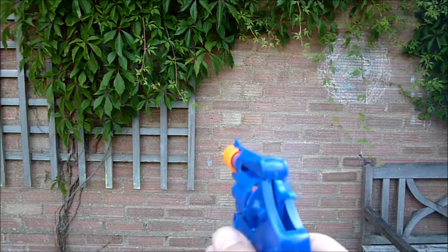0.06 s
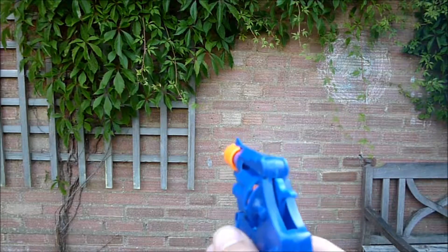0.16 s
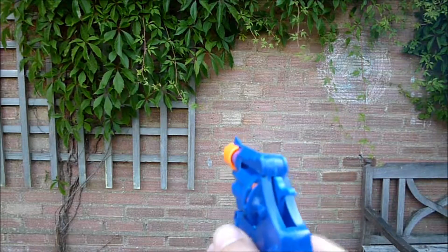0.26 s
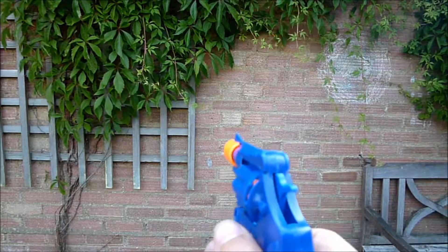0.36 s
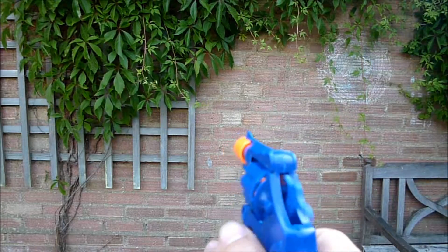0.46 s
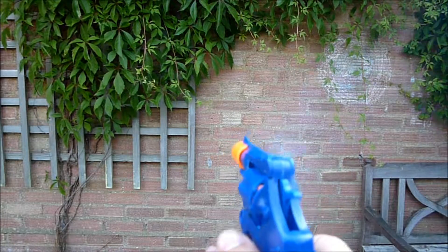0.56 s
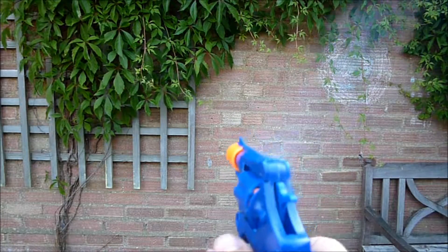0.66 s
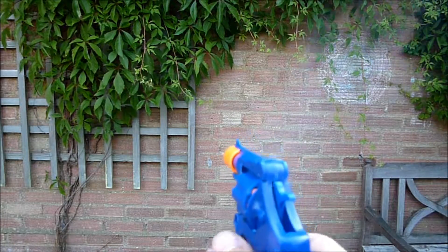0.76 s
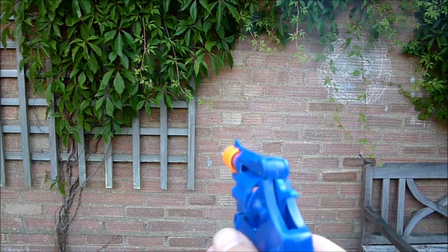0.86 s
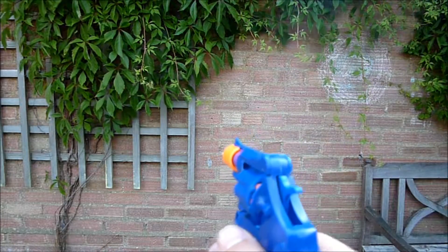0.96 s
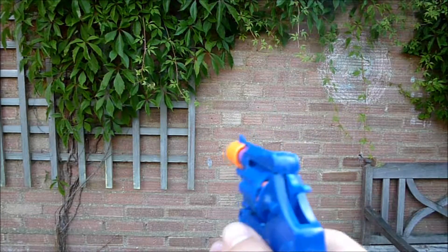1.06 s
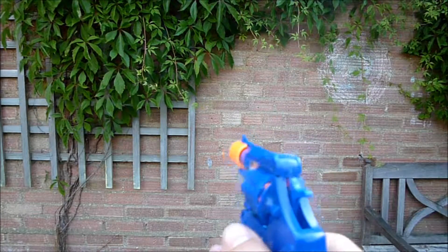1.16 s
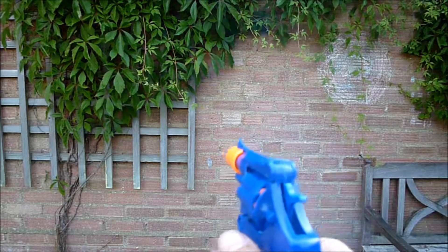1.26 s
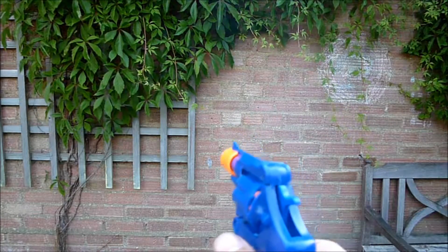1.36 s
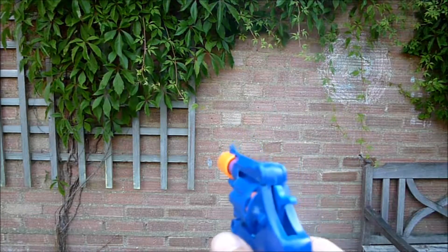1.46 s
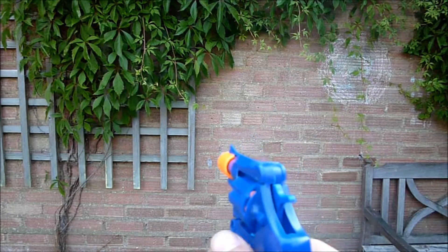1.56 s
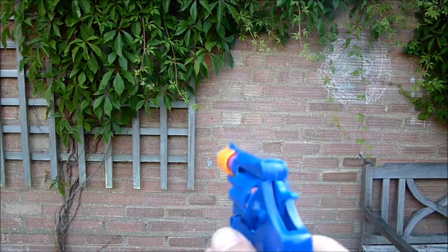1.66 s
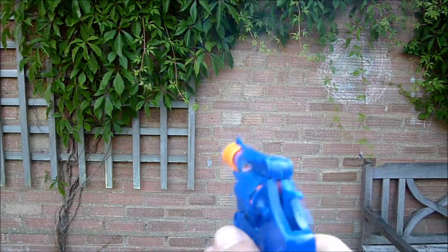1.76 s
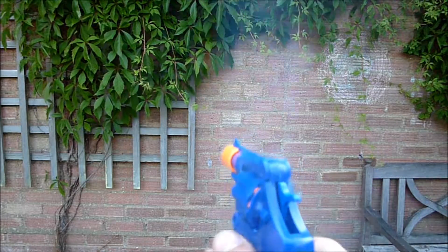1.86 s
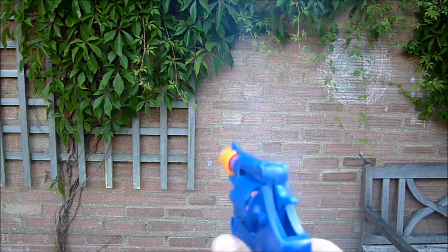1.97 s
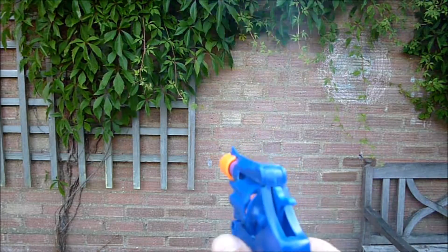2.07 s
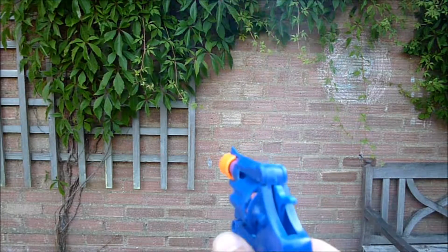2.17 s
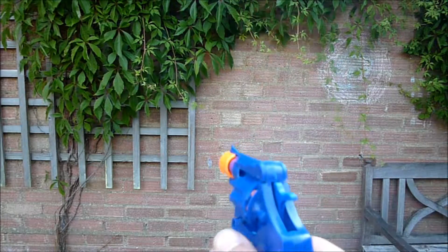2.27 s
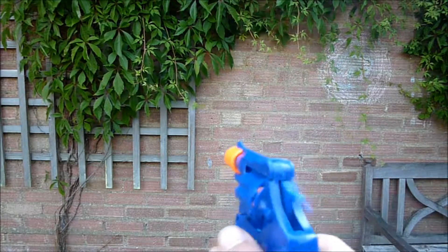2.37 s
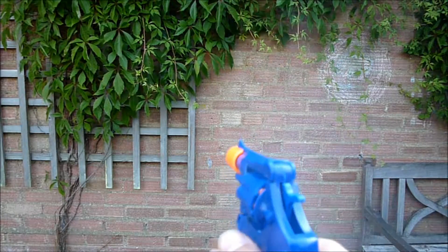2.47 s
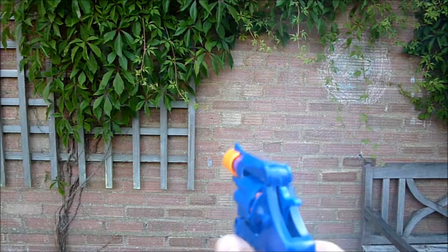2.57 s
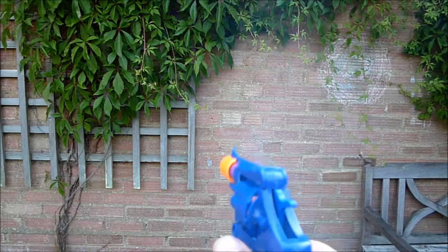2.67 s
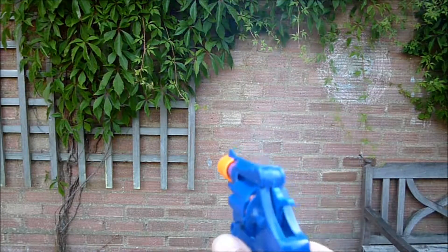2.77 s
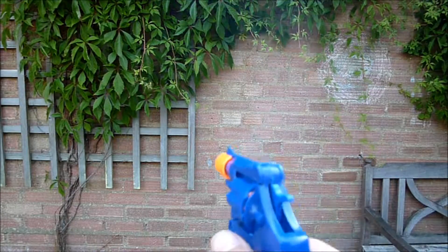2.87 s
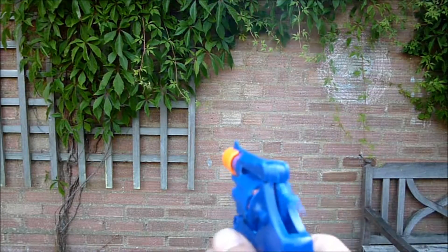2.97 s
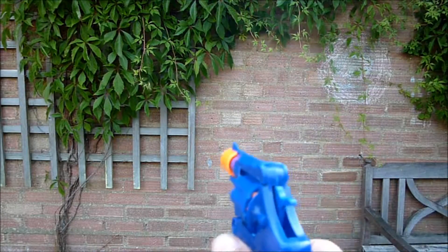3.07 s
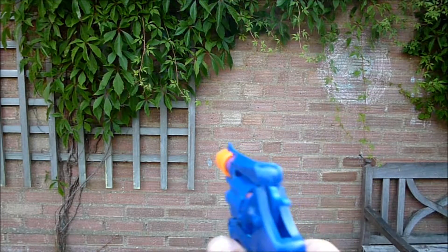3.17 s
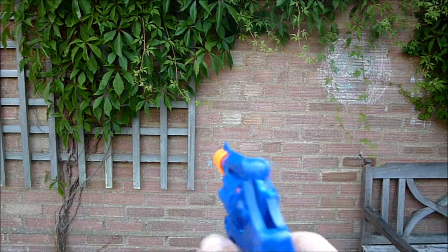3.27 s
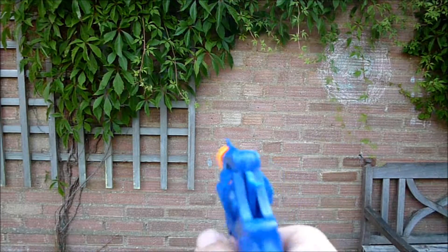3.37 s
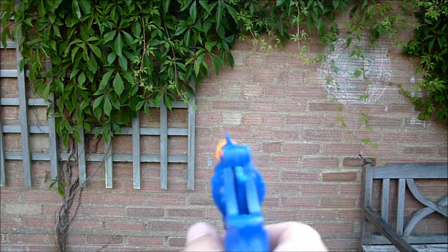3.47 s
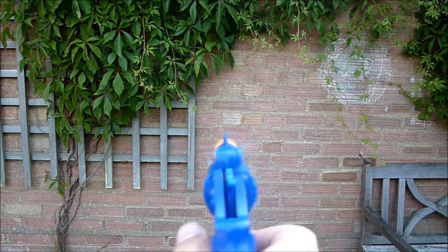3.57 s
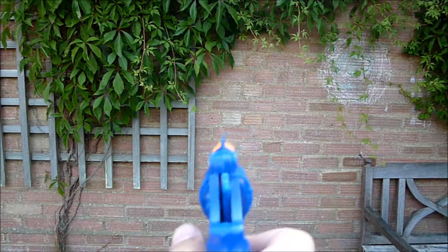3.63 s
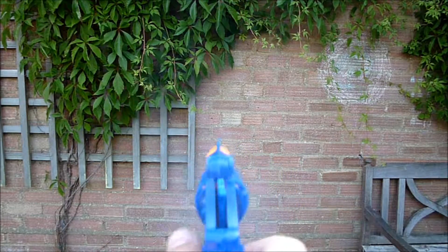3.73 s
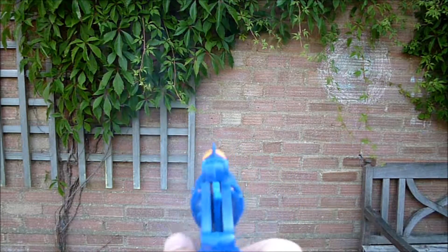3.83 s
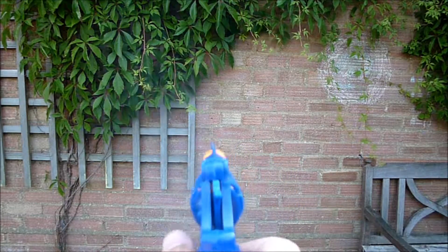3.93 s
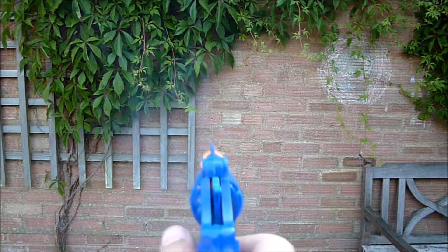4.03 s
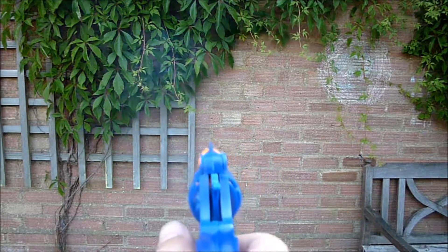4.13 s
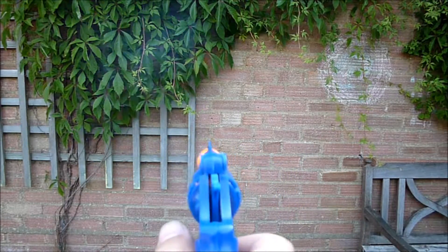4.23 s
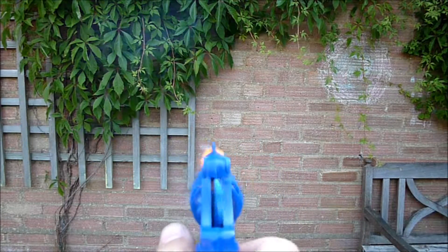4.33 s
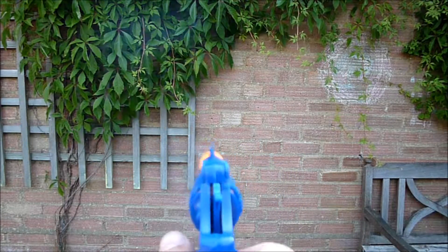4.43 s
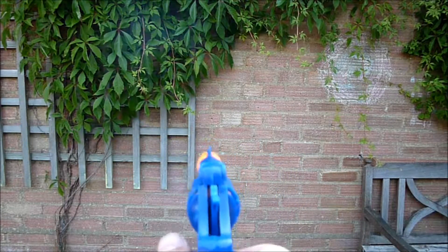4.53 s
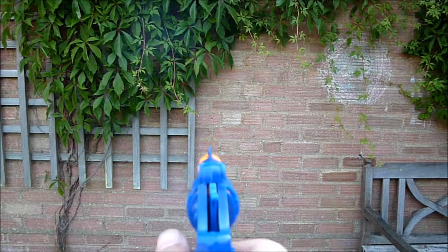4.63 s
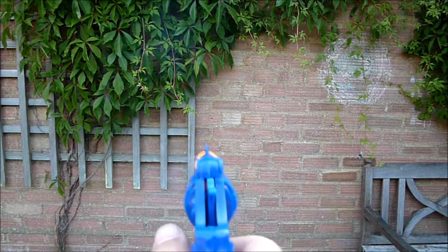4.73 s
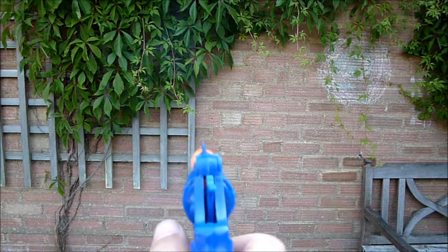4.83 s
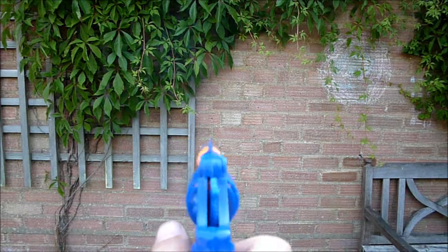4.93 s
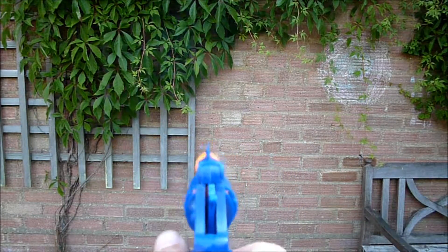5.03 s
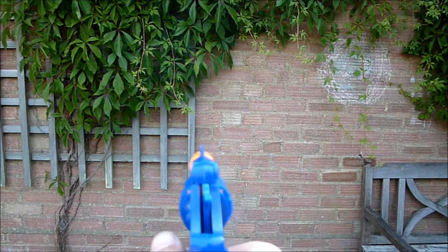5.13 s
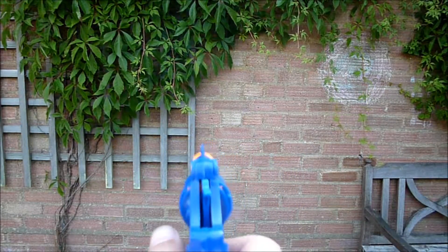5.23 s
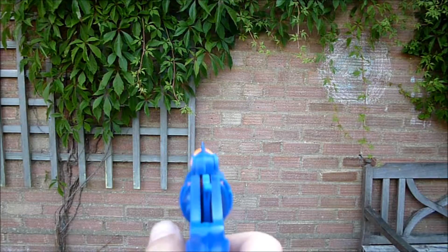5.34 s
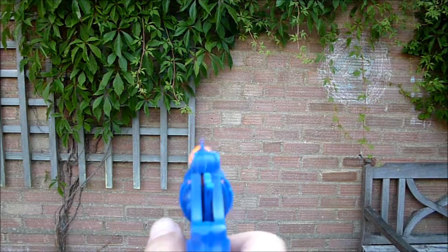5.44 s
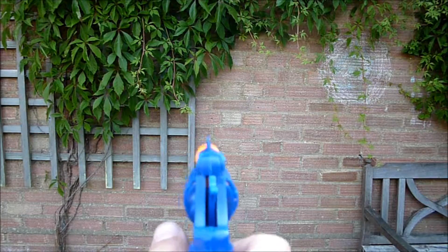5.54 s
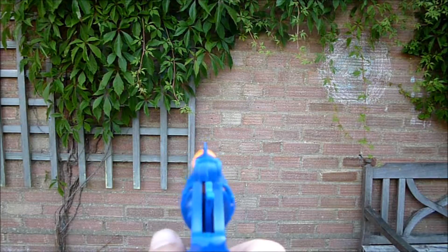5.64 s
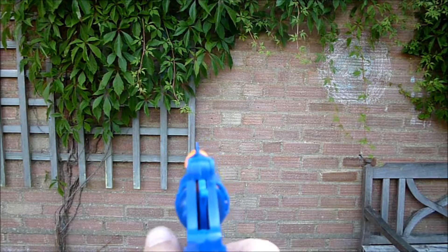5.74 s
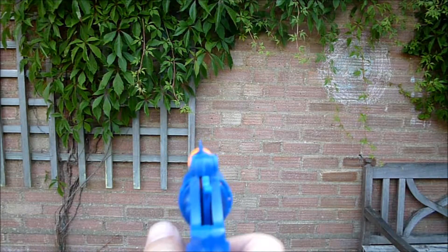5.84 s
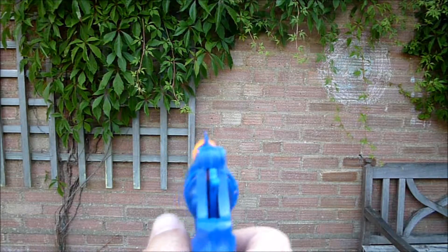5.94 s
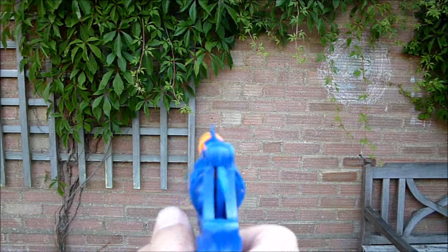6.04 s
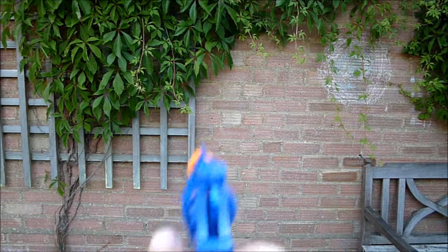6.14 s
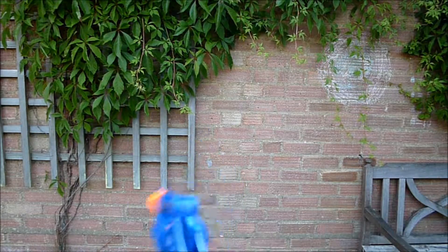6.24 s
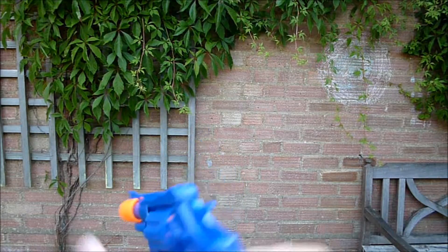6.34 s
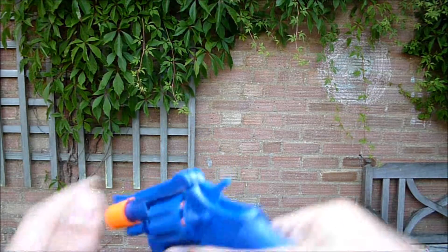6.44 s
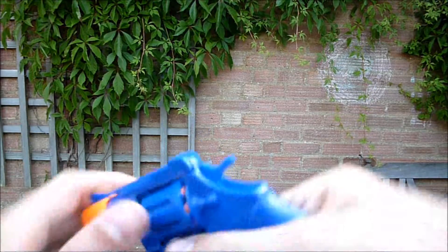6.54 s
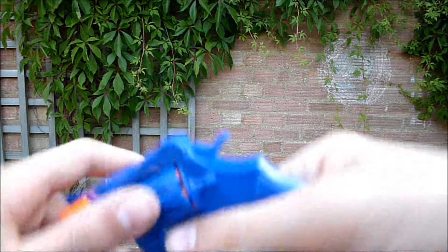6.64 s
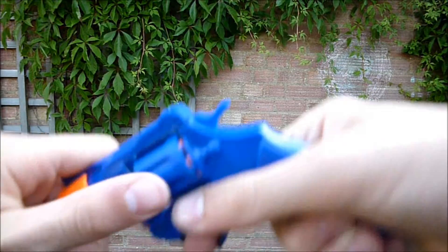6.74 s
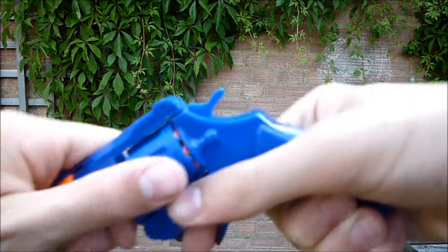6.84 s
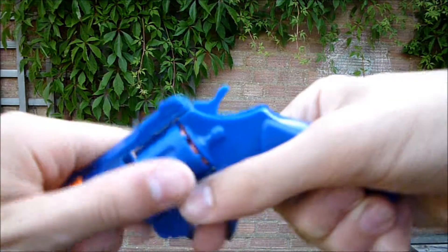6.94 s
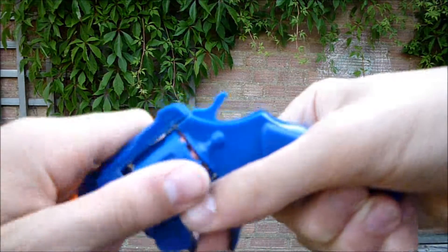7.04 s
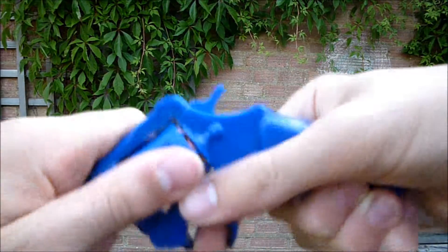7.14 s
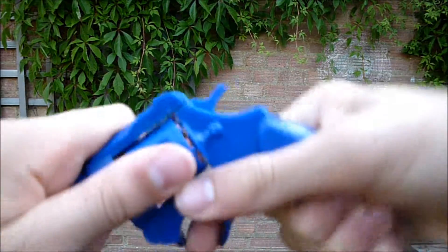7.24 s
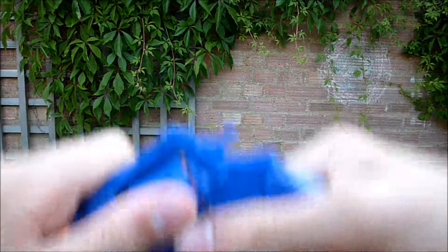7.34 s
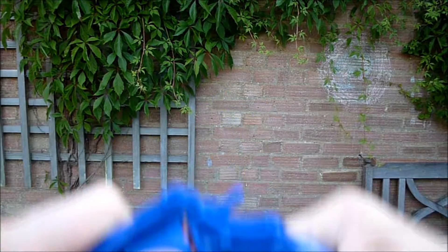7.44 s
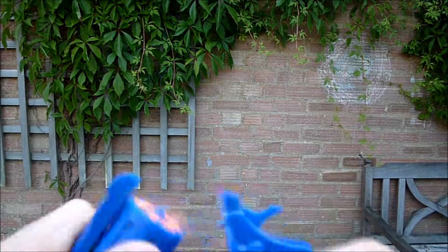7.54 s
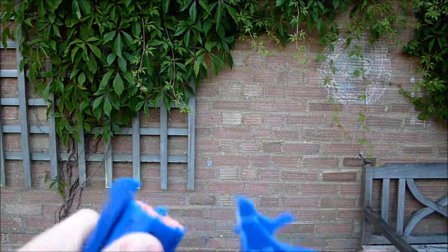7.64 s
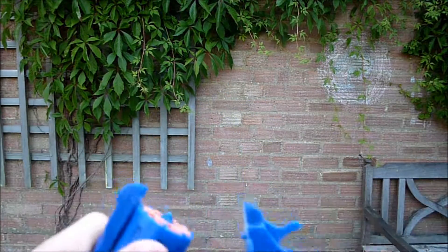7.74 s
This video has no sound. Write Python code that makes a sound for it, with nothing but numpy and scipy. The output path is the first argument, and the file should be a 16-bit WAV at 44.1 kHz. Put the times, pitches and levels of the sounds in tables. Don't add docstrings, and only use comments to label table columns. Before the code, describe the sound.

A small plastic toy revolver is worked ten times very close to a cheap microphone in a walled garden. Four cap bangs come quickly, each clipped and choked, followed by a short wall echo. A dry hammer click, one last bang, then four empty clacks follow. Ratchety scrapes, ticks and a clunk separate the pulls. Distant traffic swells in the pauses; at the end the frame snaps open loudly.

```python
import sys
import numpy as np
from scipy import signal
from scipy.io import wavfile
from scipy.ndimage import uniform_filter1d

SR = 44100
rng = np.random.default_rng(int(sys.argv[2]) if len(sys.argv) > 2 else 0)


def volts_from_db(level):
    exponent = np.asarray(level, float) / 20
    return 10 ** exponent


def transcribe(u):
    v = np.clip(np.atleast_2d(u).T, -1, 1)
    q = np.round(v * 32767).astype(np.int16)
    wavfile.write(sys.argv[1], SR, q)


N = 343980

# time in seconds, echo level in dB, blast spike (0-1),
# start and end of the choked span in ms.
CAP_BLASTS = [
    (-.10, -30, 0.1, 1, 9),
    (0.574, -35.5, 0.12, 2.67, 10.6),
    (1.2454, -32.5, 0.57, 0.57, 6.7),
    (1.8596, -30, 0.44, 0.56, 9.2),
    (2.4951, -28.5, 0.42, 1.9, 9.8),
    (3.7814, -27, 0.37, 0.84, 9.2),
]
# time in seconds, length in ms,
# bias sag (0-1).
BIAS_SAGS = [(0.5743, 2.4, 0.18), (0.5872, 2.2, 0.07), (1.2557, 2.2, 0.18), (1.8698, 1.9, 0.21),
             (2.4960, 1.25, 0.46), (2.5045, 2.8, 0.25), (3.791, 3.5, 0.15)]
# frequency in Hz, density in dB per Hz.
BLAST_COLOUR = [(29, -24.5), (50, -9), (199, -5), (331, -15), (726, -12), (917, -15.5), (1930, -9.5),
                (2650, -10), (3570, -15.5), (6610, -7.5), (8000, -9), (10400, -48), (17600, -120)]
# (Hz, dB per Hz).
CHAMBER_RING = (.574, -42, [(500, -48.5), (2900, -19), (3700, 0), (4400, -18.5), (8000, -37)])
# frequency in Hz, speed of the fading as a factor.
FADING_SPEED = [(60, 1.9), (300, 2.9), (800, 1.077), (2500, 1.24), (4500, 1.44), (8000, 1.41)]
# delay in seconds, level in dB.
WALL_RETURNS = [(.022, 2), (.030, 2.5), (.039, 2.3), (.047, 1.5), (.14, 1.3), (.21, 1.6)]

# frequency in Hz, density in dB per Hz.
ROAD_COLOUR = [(30, -1.5), (70, -5.5), (150, -1), (250, -3.5), (530, -12), (1000, -16), (2000, -25),
               (5000, -31), (8000, -44)]
# frequency in Hz, density in dB per Hz.
TYRE_COLOUR = [(40, -9.5), (100, -1), (230, 0), (500, -8.5), (1000, -14), (1400, -13), (2000, -21.5),
               (4000, -25.5), (8000, -32)]
# time in seconds, traffic level just after in dB.
GAIN_RESETS = [(0, -61.5), (0.575, -70), (1.243, -73), (1.858, -73.5), (2.497, -75), (3.097, -74),
               (3.783, -74), (4.432, -70.5), (5.024, -70), (5.612, -72.5), (6.17, -73), (7.583, -67)]
# time of the blow in seconds, level in dB,
# rise in dB per second, hold in seconds.
VEHICLES = [
    (3.766, -66.5, 19, .02),
    (7.571, -54, 33.5, 0.17),
]

# frequency in Hz, level in dB, t60 in seconds.
FRAME_MODES = [
    [(5450, 15, 0.0038), (7000, 2.5, 0.002), (6140, 13, 0.0042), (7400, -20.5, 0.0011)],
    [(910, 0, 0.027), (1050, -7.5, 0.0075)],
    [(2034, 3.5, 0.0051), (2490, -5.5, 0.014), (2970, 5, 0.01)],
    [(4120, -9, 0.0044), (4260, -6, 0.0037), (4736, -2, 0.0031)],
]
GRIP_DETUNING = [.09, .01, 0.048, 0.13]
# start in seconds, weight in dB, edge in dB, pace as a factor.
SCRAPE_EVENTS = [(0.0658, -53, 4.5, 0.94), (0.7865, -51.5, -0.5, 0.7), (1.4658, -54.5, -1, 0.8),
                 (2.0678, -61, -1, 0.95), (2.6764, -55, -1, 0.62), (3.2832, -57, 5, 0.8),
                 (3.9952, -56.5, 1, 0.79), (4.6387, -54.5, 1, 0.93), (5.226, -54.5, -0.5, 0.85),
                 (5.805, -53, -0.5, 0.86), (6.3497, -57, -2, 0.8)]
# delay in ms, level in dB, slipping in ms, upper body gain in dB.
RATCHET_TEETH = [(-5.5, -9, 4, 5.5), (0.5, -8.5, 1.0, -8), (1.5, -6, 0.64, 13.5), (5, -3.5, 1.8, -0.5),
                 (0.5, -20, 1.2, -7), (8, -4.5, 4.7, 17.5), (17, -14, 4.4, 11)]
# time in seconds, weight in dB, edge in dB.
SLACK_EVENTS = [(0.472, -54.5, -8), (1.1458, -54.5, 4), (2.4123, -48, -3), (3.6606, -47.5, 4),
                (3.7457, -58, 7), (4.3485, -54, 2), (4.4062, -54, 13), (4.934, -54, 1.5), (5.21, -63, 14),
                (5.5336, -41.5, 5), (6.0756, -44, 8.5), (7.628, -54, 9)]
# time in seconds, weight in dB, edge in dB.
CATCH_EVENTS = [(0.5416, -39, -7), (2.1216, -35.5, -1), (2.4815, -35, -3.5), (3.767, -35, 6),
                (4.4237, -28.5, -0.5), (5.6018, -33, 2.5)]
# time in seconds, weight in dB, edge in dB.
CHATTER_EVENTS = [(1.236, -47, -9), (1.850, -47, 0), (3.087, -41, -4.5), (3.773, -56, -1), (4.419, -46, -1),
                  (5.0146, -36, 5.5), (6.161, -45, -1.5), (7.575, -51, -8)]
# time in seconds, weight in dB, edge in dB.
PAWL_EVENTS = [(0.1087, -44, 4), (0.8147, -43.5, -6), (1.501, -42, 8), (2.087, -47, -4), (2.7062, -42, -6),
               (3.3173, -43.5, 9), (4.0429, -38, 3), (4.6766, -41, 3), (5.2586, -46, 2), (5.8553, -52, 2),
               (6.3887, -45.5, 6.5)]
# time in seconds, weight in dB, edge in dB, seating in dB.
HOME_EVENTS = [(0.1393, -33, -4.5, -0.5), (0.839, -40, -5, 2), (1.5224, -41, -10, 3),
               (2.129, -38.5, -14, -1), (2.7257, -44.5, -10, -0.5), (3.3402, -40, -4, 0.5),
               (4.0584, -51, 1, -2), (4.6952, -43.5, 2.5, 3.5), (5.2857, -41, -4.5, -0.5),
               (5.9234, -38, -2.5, -5), (6.5695, -39, 0.5, 0.5)]
# bright, clunk, body and upper body in dB over the weight, then slipping in ms.
SCRAPE_COLOUR = (21.5, -23, 4.5, -3)
SLACK_COLOUR = (-3, -12.5, -2.2, 5, 7.5)
CATCH_COLOUR = (12.5, -18.5, -0.2, 5.5, 8.5)
CHATTER_COLOUR = (13, -17.5, 3.5, 9, 4)
PAWL_COLOUR = (-0.5, -25, -1.5, 1.5, 9)
HOME_COLOUR = (7, -7.5, -0.5, 9.5, 7)

# time in seconds, rattle on the way down in dB, strike in dB,
# jolt of the microphone bias (0-1).
HAMMER_FALLS = [
    (.5710, -5.5, -13, 0.03),
    (1.2427, -13.5, -39, 0.16),
    (1.8576, -9, -29, 0.13),
    (2.4914, -20, -35, 0.05),
    (3.0931, -15, -11.5, 0.22),
    (3.7783, -18, -39, 0.12),
    (4.4296, -26, -12.5, 0.22),
    (5.0210, -22.5, -15.5, 0.16),
    (5.6087, -18, -13, 0.22),
    (6.167, -19.5, -15.5, 0.17),
]
# frequency in Hz, level in dB, t60 in seconds.
RATTLE_MODES = [(1310, 2, 0.0016), (2100, -3.5, 0.0034), (3250, 7, 0.0019), (4300, -1, 0.0023),
                (6200, 1, 0.0018)]
# frequency in Hz, level in dB, t60 in seconds.
STRIKE_MODES = [(913, -29.5, 0.044), (1450, -19, 0.0036), (2880, -27.5, 0.04), (1967, -12.5, 0.019),
                (2506, -5.5, 0.0072), (3100, 0.5, 0.0078), (3366, 1, 0.0031), (3730, -14, 0.0067),
                (4890, -7.5, 0.013), (5780, -14, 0.013), (6530, 1, 0.0049), (7120, -0.5, 0.0032)]
# delay in ms, level in dB.
HEAD_BOUNCES = [(0, 4), (.32, 3), (.65, -9), (.97, -1.5)]
# frequency in Hz, density in dB per Hz.
STRIKE_ECHO_COLOUR = [(500, -28.5), (900, -18.5), (1400, -26.5), (2000, -8), (2500, -17), (3050, -1),
                      (3500, -9), (4100, -13), (4800, -3.5), (5500, -12), (6500, -6.5), (8000, -12.5)]

# frequency in Hz, level in dB, t60 in seconds.
SNAP_MODES = [(930, -20, 0.017), (1570, 11.5, 0.0013), (2350, 0, 0.0024), (2770, -30.5, 0.041),
              (2700, -38, 0.054), (2990, 7, 0.0021), (3890, 5.5, 0.0022), (4300, -2, 0.0033),
              (4930, -40, .085), (4880, -46, .08), (5650, 1, 0.0025), (6260, -3.5, 0.0036),
              (7000, -13, 0.00062)]

# frequency in Hz, level in dB.
WHINE_TONES = [(444, -74.5), (2665, -78.5), (3112, -79.5), (3553, -77.5), (6223, -84.5), (6665, -76)]
# frequency in Hz, density in dB per Hz.
HISS_COLOUR = [(30, -6), (60, -2), (150, -10), (500, -10.5), (1000, -11.5), (2000, -11), (3200, -13),
               (4500, -13), (6500, -13.5), (8000, -15.5)]


def evened(x):
    return x / np.sqrt(np.mean(x ** 2) + 1e-20)


def read(points, hz):
    f, value = np.transpose(points)
    return np.interp(np.log(hz + 1), np.log(f + 1), value)


def add(mix, s, sound):
    i = round(s * SR)
    sound = sound[max(-i, 0):]
    part = mix[max(i, 0):][:len(sound)]
    part += sound[:len(part)]


def smooth_grid(shape, bins, frames):
    field = uniform_filter1d(rng.standard_normal(shape), size=bins, axis=0)
    return evened(uniform_filter1d(field, size=frames, axis=1))


def garden(colour, tilt_db=0):
    near_wall_s, leak_db = 0.0085, -31
    early_db, early_s, decay_db_per_s = 14, 0.08, 68.5
    wall_blur_s, foliage_db, crackle_db = 0.0022, 1, 1.5
    hz, t, z = signal.stft(rng.standard_normal(int(0.8 * SR)), SR, nperseg=128, noverlap=96)
    late = np.maximum(t - near_wall_s, 0)
    level_db = -early_db * (1 - np.exp(-late / early_s)) - decay_db_per_s * late
    level_db += leak_db * np.clip((near_wall_s - t) * 1000 + 0.5, 0, 1)
    level_db += sum(db * np.exp(-((t - s) / wall_blur_s) ** 2) for s, db in WALL_RETURNS)
    foliage = smooth_grid(z.shape, bins=3, frames=20)
    crackle = smooth_grid(z.shape, bins=16, frames=4)
    tone_db = read(colour, hz) + tilt_db * np.log2((hz + 100) / 2000)
    gain_db = level_db * read(FADING_SPEED, hz)[:, None] + tone_db[:, None]
    z *= volts_from_db(gain_db + foliage_db * foliage + crackle_db * crackle)
    tail = signal.istft(z, SR, nperseg=128, noverlap=96)[1]
    return tail / np.sqrt(np.mean(tail[600:2400] ** 2))


def echoes():
    out = np.zeros(N)
    for s, level_db, *_ in CAP_BLASTS:
        add(out, s, volts_from_db(level_db) * garden(BLAST_COLOUR, tilt_db=-3.5))
    chamber_s, chamber_db, chamber_colour = CHAMBER_RING
    add(out, chamber_s, volts_from_db(chamber_db) * garden(chamber_colour))
    return out


def noise(shape, patchy_db):
    a, b, patches = rng.standard_normal((N // 256 + 5, 513, 3)).T
    patches = evened(uniform_filter1d(uniform_filter1d(patches, 10, 0), 12, 1))
    hz = np.fft.rfftfreq(1024, 1 / SR)
    z = (a + 1j * b) * volts_from_db(read(shape, hz)[:, None] + patchy_db * patches)
    return evened(signal.istft(z, nperseg=1024, noverlap=768)[1][:N])


def traffic():
    rest_db, recovery_s, near_floor_db, duck_db = -52.5, 0.71, -82, -19
    s, start_db = np.transpose(GAIN_RESETS)
    t = np.arange(N) / SR
    k = np.clip(np.searchsorted(s, t) - 1, 0, None)
    far_db = rest_db + (start_db[k] - rest_db) * np.exp(-(t - s[k]) / recovery_s)
    near = volts_from_db(near_floor_db)
    for blow_s, db, rise_db, hold_s in VEHICLES:
        swell_db = rise_db * np.minimum(t - blow_s + hold_s, 0)
        near = near + volts_from_db(db + np.where(t < blow_s, swell_db, duck_db))
    return volts_from_db(far_db) * noise(ROAD_COLOUR, patchy_db=1.8) + near * noise(TYRE_COLOUR, patchy_db=1.3)


def ring(modes, spread=0.082):
    t = np.arange(2000) / SR
    detune = 1 + spread * rng.uniform(-0.2, 1, len(modes))
    x = np.zeros(len(t))
    for (hz, db, t60), d in zip(modes, detune):
        onset = 1 - np.exp(-t * hz * 1.46)
        x += volts_from_db(db - 60 * t / t60) * np.sin(2 * np.pi * hz * d * t) * onset
    return x / abs(x).max()


def slips(ms, count, fading=1.5):
    x = np.zeros(int(ms * SR / 1000) + 2)
    place, size = rng.random(count), rng.normal(0, 1, count)
    place[0], size[0] = 0, 1.2
    np.add.at(x, (place * (len(x) - 1)).astype(int), size * np.exp(-fading * place))
    return x / np.linalg.norm(x)


def knock(weight_db, edge_db, seating_db=0, *, tone, count, fading):
    *tone_db, ms = tone
    levels_db = weight_db + np.array(tone_db)
    levels_db = levels_db + edge_db * np.array([1, 0, 0, 0.18])
    levels_db = levels_db + seating_db * np.array([0, 1, 0, 1])
    out = 0
    for db, group, spread in zip(levels_db, FRAME_MODES, GRIP_DETUNING):
        modes = ring(group, spread)
        rung = np.convolve(slips(ms, count, fading), modes)
        out = out + volts_from_db(db + 4.5) * rung * np.linalg.norm(modes) / np.linalg.norm(rung)
    return out


def trigger():
    out = np.zeros(N)
    for s, weight_db, edge_db, pace in SCRAPE_EVENTS:
        for ms, db, slip_ms, upper_db in RATCHET_TEETH:
            tone = (*SCRAPE_COLOUR[:3], SCRAPE_COLOUR[3] + upper_db, slip_ms)
            tooth = knock(weight_db + db, edge_db, tone=tone, count=70, fading=1.1)
            add(out, s + pace * ms / 1000, tooth)
    parts = ((SLACK_EVENTS, SLACK_COLOUR, 4.5), (CATCH_EVENTS, CATCH_COLOUR, 4.5),
             (CHATTER_EVENTS, CHATTER_COLOUR, 1.1), (PAWL_EVENTS, PAWL_COLOUR, 4.5),
             (HOME_EVENTS, HOME_COLOUR, 4.5))
    for rows, tone, fading in parts:
        for s, *force_db in rows:
            add(out, s, knock(*force_db, tone=tone, count=30, fading=fading))
    return out


def hammer():
    fall_s, lean, ceiling = 0.003, 0.33, 0.18
    out = np.zeros(N)
    for s, rattle_db, strike_db, _ in HAMMER_FALLS:
        add(out, s, -volts_from_db(rattle_db) * np.convolve(slips(2.9, count=48, fading=0.3), ring(RATTLE_MODES)))
        frame = ring(STRIKE_MODES, spread=0.035)
        hit = s + fall_s
        for ms, db in HEAD_BOUNCES:
            add(out, hit + ms / 1000, -volts_from_db(strike_db + db) * frame)
        after_rattle = np.convolve(slips(3.5, count=24, fading=1.9), ring(RATTLE_MODES))
        add(out, hit, volts_from_db(strike_db + 2) * after_rattle)
        add(out, hit, volts_from_db(strike_db - 34.5) * garden(STRIKE_ECHO_COLOUR))
    out -= lean * uniform_filter1d(abs(out), size=24)
    return np.where(out > 0, ceiling * np.tanh(out / ceiling), out)


def snap():
    snap_s, snap_db = 7.5825, 1
    out, crack = np.zeros(N), ring(SNAP_MODES, spread=0)
    crack[:24] += 0.073 * np.hanning(24)
    add(out, snap_s, volts_from_db(snap_db) * crack)
    rattle = np.convolve(slips(4.86, count=40, fading=1.9), crack[:50])
    add(out, snap_s + 0.00062, volts_from_db(snap_db - 18) * rattle)
    return out


def scene():
    parts, crack = trigger(), snap()
    tail = garden([(100, -7.0), (1000, 3.5), (3000, 2.5), (8000, 2)])
    tail /= np.linalg.norm(tail)
    wet = signal.oaconvolve(volts_from_db(-20.5) * parts + volts_from_db(-33) * crack, tail)[:N]
    return (echoes() + traffic() + parts + hammer() + crack + wet)[None]


def overload():
    spike_ms, jump, coupling_hz, rest_offset, droop_s = 0.35, 0.46, 160, 0.023, 0.028
    hearing, steps, sags, kicks = np.ones(N), np.zeros(N), np.zeros(N), np.zeros(N)
    for s, _, spike, start_ms, end_ms in CAP_BLASTS[1:]:
        add(hearing, s + start_ms / 1000, -np.ones(int((end_ms - start_ms) * SR / 1000)))
        add(sags, s, -spike * np.hanning(int(spike_ms * SR / 1000) + 2))
        add(steps, s + start_ms / 1000, -jump * np.ones(1))
    for s, _, _, jolt in HAMMER_FALLS:
        add(steps, s + 0.0024, -jolt * np.hanning(40) / np.hanning(40).sum())
    for s, ms, depth in BIAS_SAGS:
        ragged = abs(uniform_filter1d(3 * rng.standard_normal(300), 8))
        add(sags, s, -depth * (0.077 + 0.59 * ragged)[:int(ms * SR / 1000)])
    for s, _ in GAIN_RESETS[1:]:
        add(kicks, s + 0.0021, np.hanning(200) / np.hanning(200).sum())
    coupling = signal.butter(2, coupling_hz, "high", fs=SR)
    bias = signal.lfilter(*coupling, np.cumsum(steps))
    droop = signal.lfilter([1], [1, -np.exp(-1 / (droop_s * SR))], kicks)
    return hearing, np.maximum(bias + sags, -0.68) + rest_offset * (1 - droop)


def top_cut(x):
    return signal.sosfilt(signal.butter(12, 8610, fs=SR, output="sos"), x)


def record(dry):
    limit, hiss_db, notch_hz, notch_width_hz, edge_hz = 0.72, -64, 4390, 125, 7750
    hearing, bias = overload()
    t = np.arange(N) / SR
    whine = sum(volts_from_db(db - 1) * np.sin(2 * np.pi * hz * t) for hz, db in WHINE_TONES)
    hiss = volts_from_db(hiss_db) * noise(HISS_COLOUR, patchy_db=0.0)
    circuit = (hiss + whine) * (0.26 + 0.78 * hearing)
    x = limit * np.tanh(dry / limit) * hearing + bias + circuit
    x = signal.lfilter(*signal.iirnotch(notch_hz, notch_hz / notch_width_hz, SR), x)
    edge = signal.firwin(161, edge_hz, window=("kaiser", 8.5), fs=SR)
    x = signal.oaconvolve(np.pad(x, ((0, 0), (80, 80)), "edge"), edge[None], "valid")
    return top_cut(x)


dry = scene()
out = record(dry)
transcribe(out)
```